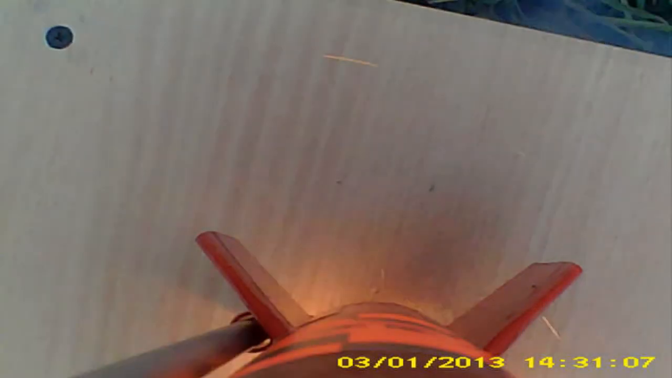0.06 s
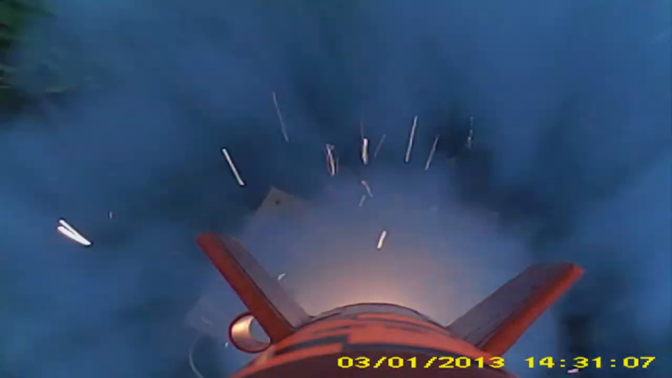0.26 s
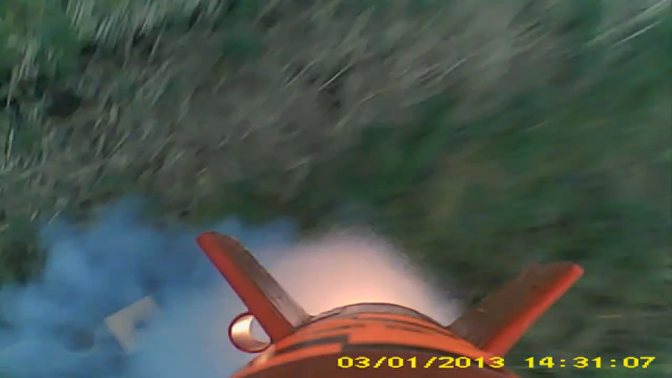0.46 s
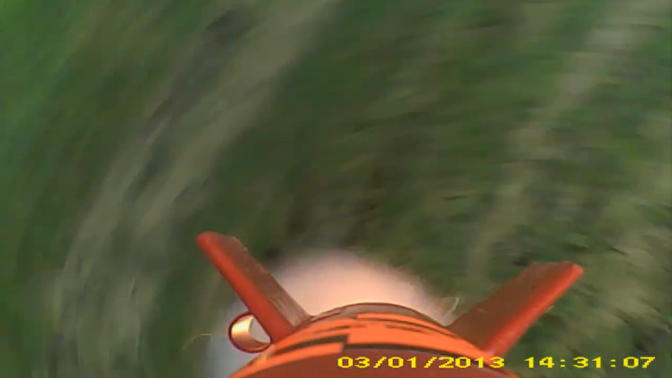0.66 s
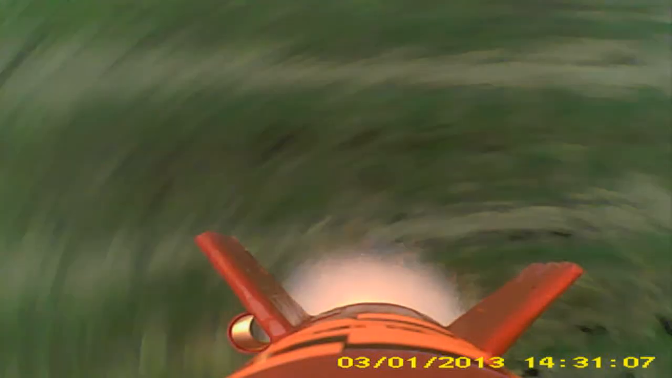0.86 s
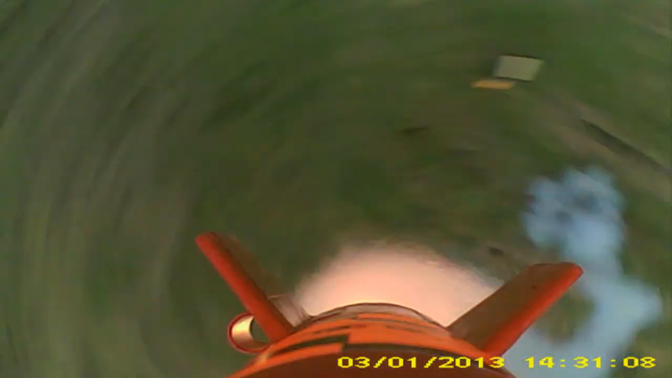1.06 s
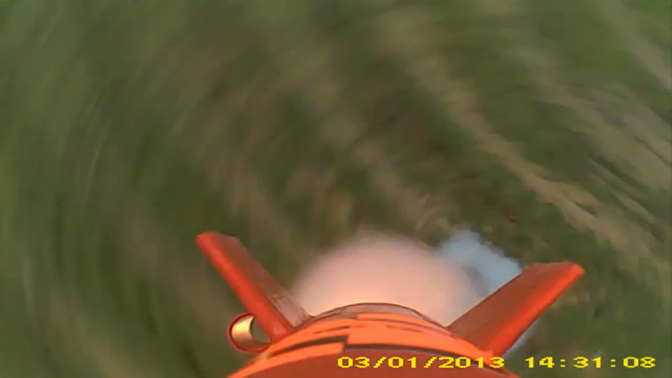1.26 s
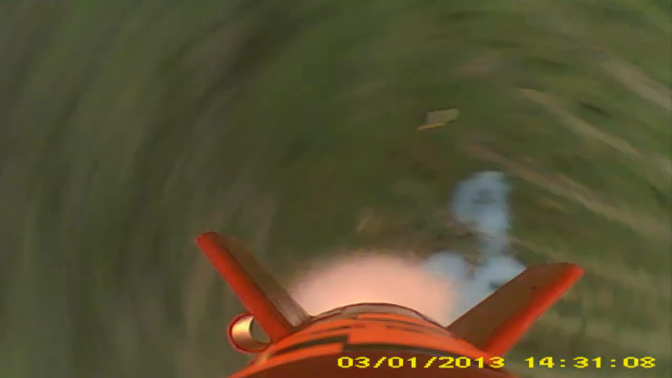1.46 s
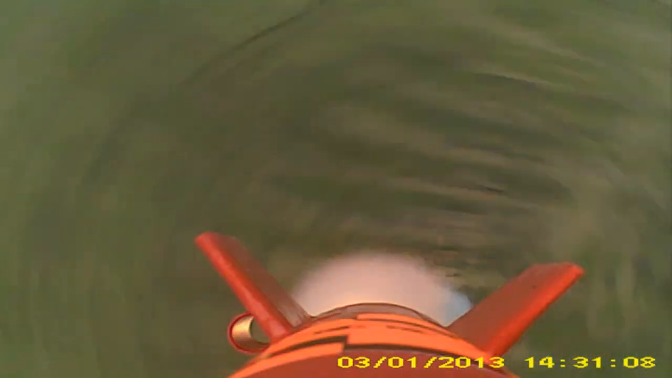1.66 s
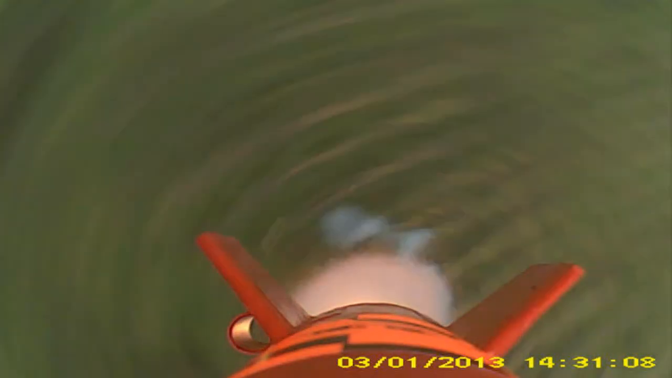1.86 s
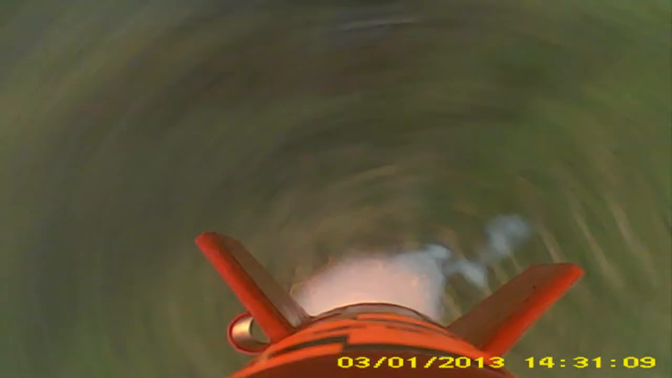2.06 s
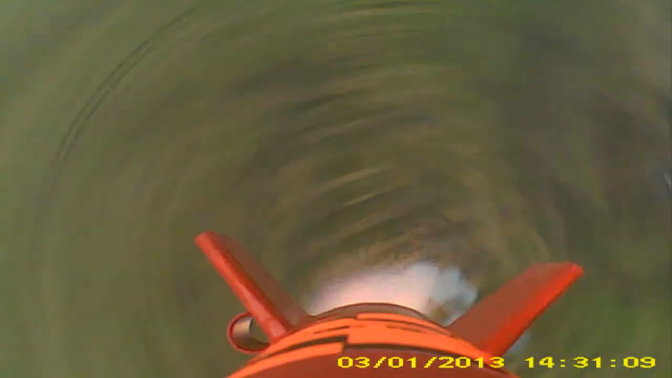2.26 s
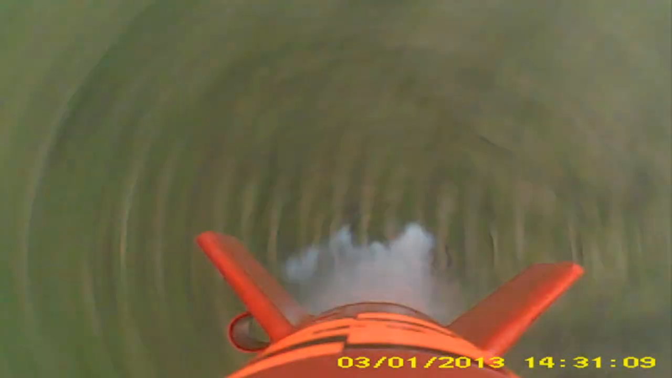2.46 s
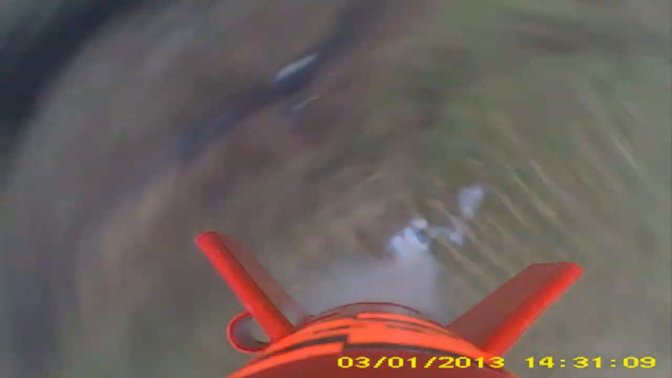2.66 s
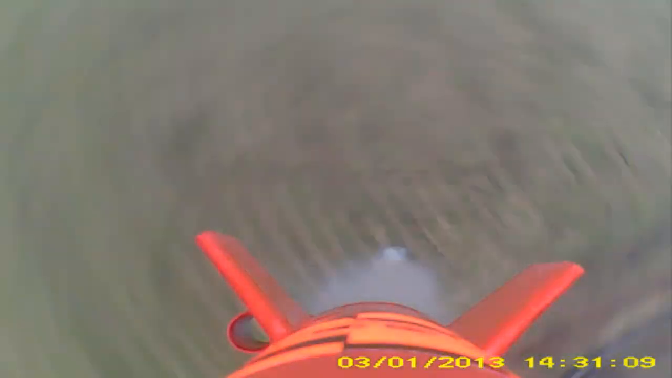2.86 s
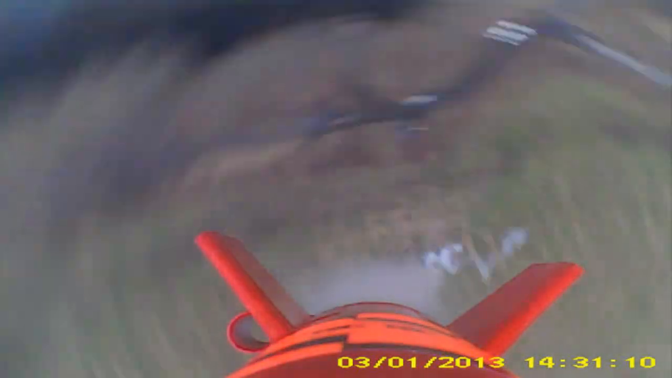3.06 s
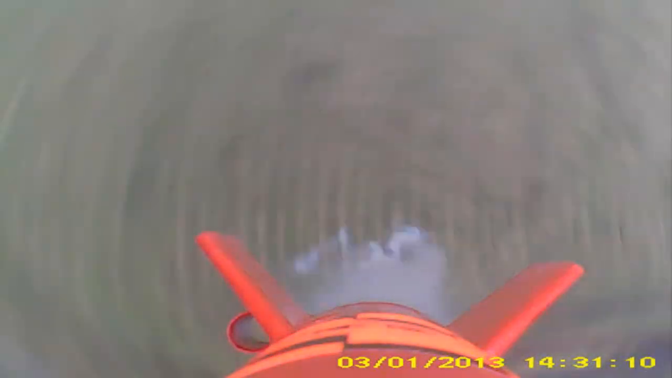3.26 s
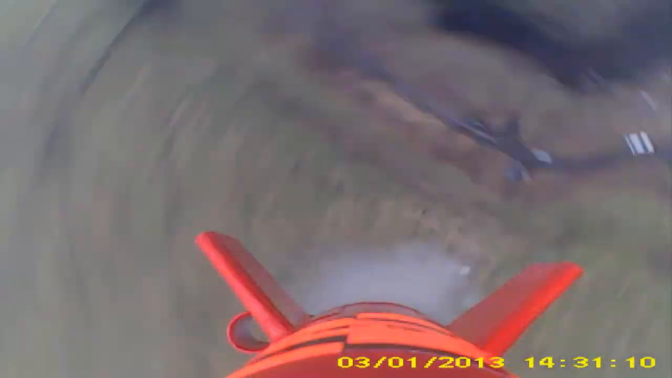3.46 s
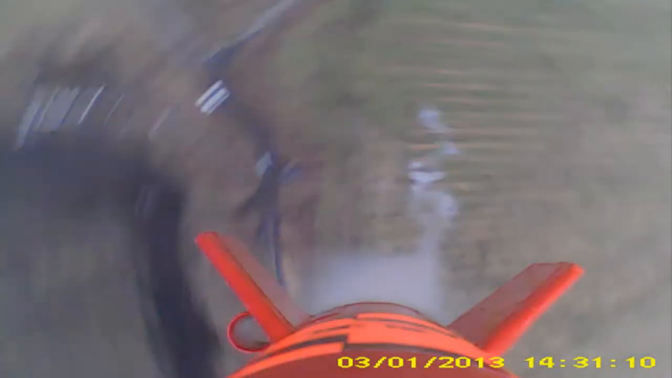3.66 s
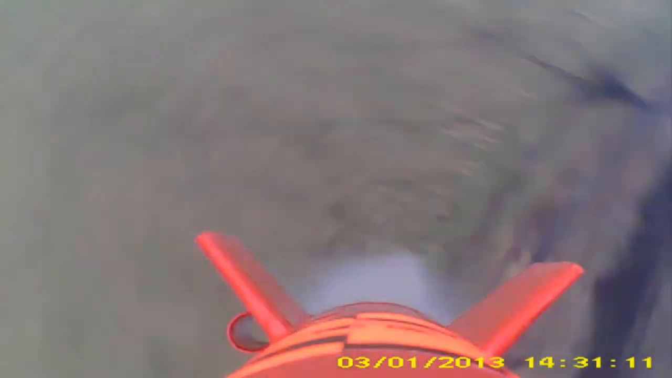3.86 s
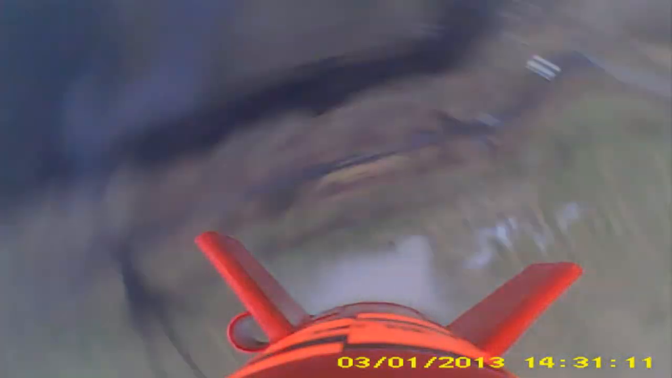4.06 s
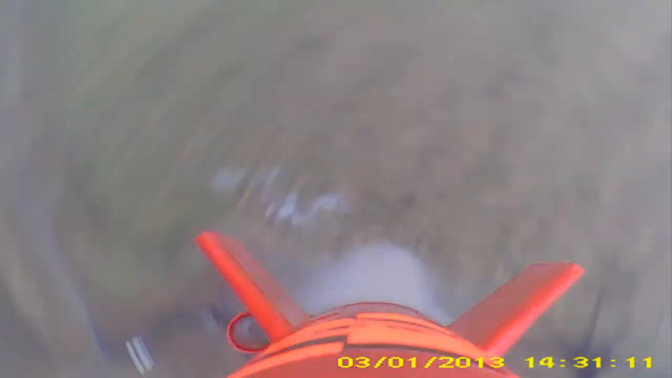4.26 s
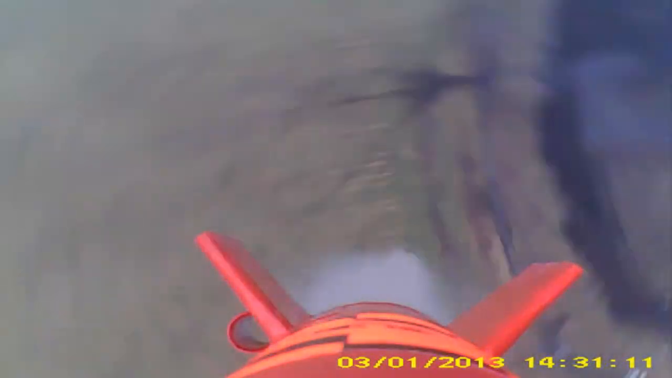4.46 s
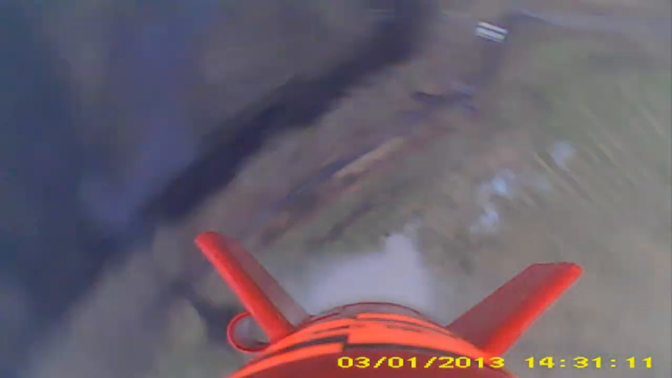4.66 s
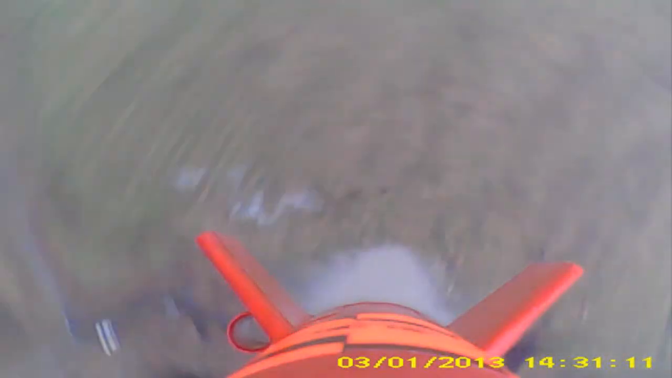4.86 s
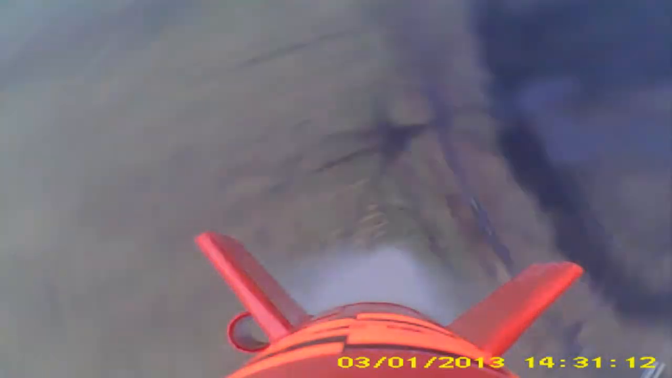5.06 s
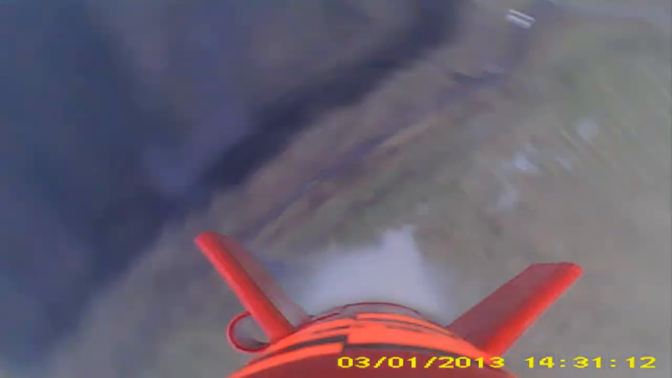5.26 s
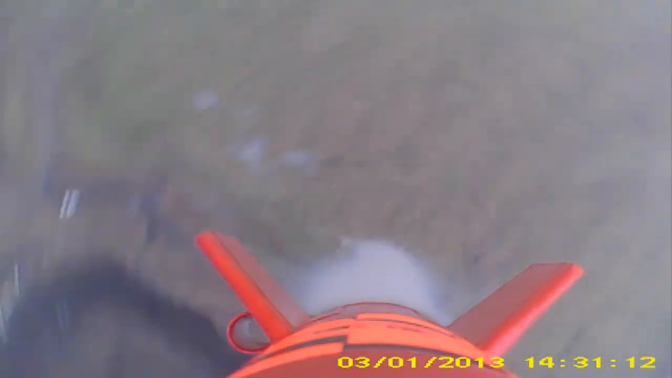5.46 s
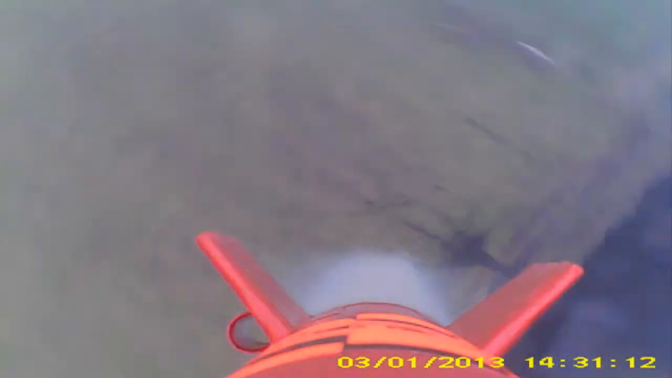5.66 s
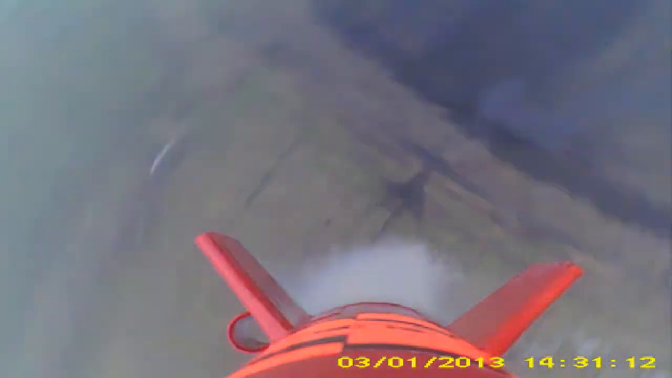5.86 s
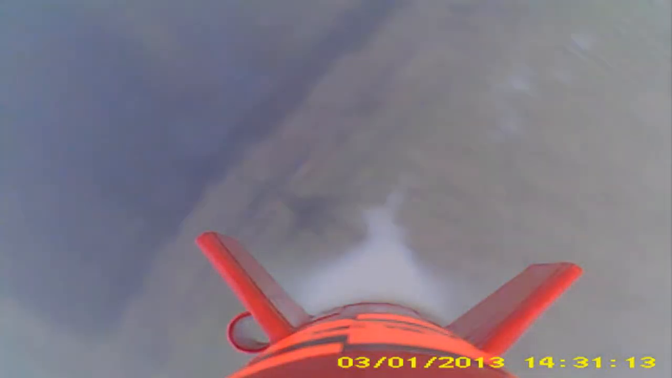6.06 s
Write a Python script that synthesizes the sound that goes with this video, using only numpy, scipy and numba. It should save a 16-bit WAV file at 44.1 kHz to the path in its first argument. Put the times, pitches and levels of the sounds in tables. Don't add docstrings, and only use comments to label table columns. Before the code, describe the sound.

A tiny, low-quality microphone rides on a hobby rocket outdoors, very close and dry, with gritty, band-limited sound and a brittle metallic hiss on top. From 0 to 0.12 s the motor chuffs in a quick string of uneven pops, with a tiny hush before it catches. Until about 0.5 s the ignition blast rumbles and crackles harshly. From 0.5 to 1 s a clearer, hollow, tube-like roar swells with less crackle, dipping for an instant near 0.94 s. From 1.2 s wind increasingly overloads the microphone, and from 1.4 to about 4 s dense ragged static and buffeting mask the muffled roar. From 4.5 s the crackle gradually thins. Around 5.65 to 5.72 s come a few short gust snaps and a momentary calm; then a fuller, smoother rush rises, dips briefly at 5.97 s and continues to the end.

```python
import sys
import numpy as np
from scipy import signal
from scipy.fft import rfft, irfft, next_fast_len
from scipy.io import wavfile
from scipy.ndimage import uniform_filter1d, map_coordinates
from numba import njit

SR = 44100
rng = np.random.default_rng(int(sys.argv[2]) if len(sys.argv) > 2 else 0)


def invert_db(level):
    return 10 ** (np.asarray(level, dtype=float) / 20)


def log_audio(samples):
    frames = np.atleast_2d(samples).T
    limited = np.clip(frames, -1, 1)
    pcm = np.round(limited * 32767).astype(np.int16)
    wavfile.write(sys.argv[1], SR, pcm)


N = 269892
RATE = 8000
RAIL = .29
COUNT = int(N * RATE / SR) + 8
IGNITED_S, CLEARS_PAD_S = .118, .5
T = np.arange(COUNT) / RATE
LIT = T > IGNITED_S
NEAR_PAD = LIT & (T < CLEARS_PAD_S)


def curves(table):
    s, *columns = np.transpose(table)
    return [np.interp(T, s, c) for c in columns]


def steady(x):
    return x / np.sqrt(uniform_filter1d(x ** 2, size=1600))


def low_pass(x, order, top_hz):
    return signal.lfilter(*signal.butter(order, top_hz, fs=RATE), x)


def walk(rate_hz):
    k = int(RATE / rate_hz)
    held = np.repeat(rng.standard_normal(COUNT), k)[:COUNT]
    w = uniform_filter1d(uniform_filter1d(held, k), k)
    return w / w.std()


@njit
def band(x, hz, width_hz):
    y, b, l = np.empty(len(x)), 0., 0.
    for i in range(len(x)):
        g, k = np.tan(np.pi * hz[i] / RATE), width_hz[i] / hz[i]
        v = (b + g * (x[i] - l)) / (1 + g * (g + k))
        b, l, y[i] = 2 * v - b, l + 2 * g * v, k * v
    return y


# (time [s], level [dB], tube resonance [Hz])
ROAR = [(0, -13, 1080), (.12, -17.5, 1020), (.2, -22.5, 1496), (.3, -21.5, 1735), (.47, -19.5, 1550),
        (.52, -18.5, 940), (.88, -16, 1066), (1.0, -17.5, 1110), (1.15, -19, 1265), (1.4, -32.5, 1309),
        (2.3, -24.5, 1057), (3.0, -28, 1143), (3.9, -27, 1498), (4.6, -24, 1449), (5.2, -26.5, 1402),
        (5.68, -27.5, 1331), (5.82, -17, 1157), (6.12, -15.5, 990)]


def roar(share):
    rush_db, hz = curves(ROAR)
    louder_db = rush_db + 19.5
    width_hz = 850 + 32 * share
    boom_db = -9 + .71 * share + 1.31 * louder_db
    hiss_db = -7.5 + .29 * share - .16 * louder_db
    hiss_db += -8 * ~LIT + 4 * NEAR_PAD
    tube, boom, hiss, buffet = rng.standard_normal((4, COUNT))

    dull, bright = low_pass(tube, 4, 1900), low_pass(tube, 4, 2500)
    tube = dull + np.clip(share / 10, 0, 1) * LIT * (bright - dull)
    tube = steady(band(band(tube, hz, 1.7 * width_hz), hz, 1.7 * width_hz))
    boom = steady(band(band(boom, .27 * hz, .62 * hz), .45 * hz, .63 * hz))
    hiss = signal.lfilter(*signal.butter(1, 250, "high", fs=RATE), hiss)
    rush = steady(tube + invert_db(boom_db) * boom + invert_db(hiss_db) * hiss)
    rush *= invert_db(rush_db + flame_db() + lulls_db())

    rocking = invert_db(-32) * (share / 25) ** 2 + invert_db(-29.5) * NEAR_PAD
    return rush + rocking * steady(low_pass(buffet, 1, 220)), tube


# (time [s], peak [dB])
CHUFFS = [(.002, -28), (0.011, -33), (0.022, -26), (0.032, -20), (0.044, -27), (.056, -37), (.061, -16),
          (.072, -23), (0.078, -17), (.087, -17), (0.114, -24), (.123, -24)]


def flame_db():
    puffs = sum(invert_db(db + 19) * np.exp(-((T - s - .003) / .0019) ** 2) for s, db in CHUFFS)
    db = np.where(T < IGNITED_S + .01, 20 * np.log10(.4 + 1.1 * puffs), 1.1 * walk(40))
    return db - 10 * ((T > .096) & (T < .115))


# (time [s], strength [suction rms], half-length [s])
GUSTS = [
    (.0625, 6, .0001),
    (.0882, 6, .0001),
    (5.68, -.6, .055),
    (5.651, 1.6, .003),
    (5.675, 1.8, .003),
    (5.689, 1.5, .002),
    (5.699, 1.8, .0004),
    (5.712, 1.3, .005),
    (5.724, 1.6, .001),
]


def gusts():
    return sum(size * (np.abs(T - s) < half_s) for s, size, half_s in GUSTS)


# (time [s], readings on the rail [%])
SLIPSTREAM = [(0, 0), (.125, 4.5), (.21, 11), (.28, 27), (.34, 23), (.4, 12.5), (.48, 8.5), (.52, .7),
              (.8, 1.6), (1.0, 7), (1.15, 13), (1.35, 23), (2.5, 28.5), (3.75, 22.5), (4.6, 12.5),
              (5.5, 5.2), (5.76, 2), (6.12, 1.8)]


def overload():
    share, = curves(SLIPSTREAM)
    rush, tube = roar(share)
    fast = steady(signal.lfilter([1], [1, .45], rng.standard_normal(COUNT)))
    falling = steady(.4 * np.roll(tube, -1) - .11 * np.roll(tube, 1) + .3 * tube)
    eddy = np.clip(.33 + .019 * share, .01, 1)
    suction = np.sqrt(eddy) * fast - np.sqrt(1 - eddy) * falling
    suction += .037 * walk(25) + gusts()

    p = np.clip(share / 100 * LIT, 1e-4, .6)
    limit = 4.91 * ((1 - p) ** .14 - p ** .14)
    kick = .018 / (1 + 6.7 * p)
    drift = .031 / (1 + (p / .094) ** 2)
    ceiling = .24 + .0073 * share
    return convert(rush, suction - limit, kick, ceiling, drift, 5.9, .7)


@njit
def convert(rush, excess, kick, ceiling, drift, depth, fade):
    y, rebound, centre = np.empty(len(rush)), 0., 0.
    for i in range(len(rush)):
        if excess[i] > 0:
            y[i] = -RAIL
            rebound += kick[i] * (1 + depth * excess[i])
        else:
            v = rush[i] + rebound + centre
            v /= (1 + (v / ceiling[i]) ** 2) ** .5
            y[i] = min(max(v, -RAIL), RAIL)
            rebound *= fade
        centre -= drift[i] * y[i]
    return y


# (block [number], peak [dB])
SEAMS = [(3, -64), (8, -67), (11, -70), (23, -67), (29, -59), (32, -67), (35, -59), (38, -64), (39, -68),
         (41, -68), (44, -63), (45, -65), (48, -66), (50, -63), (53, -62), (54, -67), (56, -66), (60, -66),
         (69, -65), (71, -60), (74, -66), (77, -63), (84, -69), (90, -64), (95, -63), (101, -61),
         (110, -60), (117, -69), (129, -70)]


def seam_ticks():
    block, peak_db = np.transpose(SEAMS)
    faint = np.setdiff1d([k for k in range(140) if k % 3 != 1], block)
    peak_db = np.append(peak_db, -85 + 6 * rng.standard_normal(len(faint)))
    s = .1447 + 2048 / 48000 * np.append(block, faint)
    spikes = np.zeros(N)
    spikes[((s + .0012) * SR).astype(int)] = invert_db(peak_db + 23.5) * np.sign(rng.standard_normal(len(s)))
    u = np.arange(-20, 21) / SR / 5e-5
    return np.convolve(spikes, u * np.exp(-u ** 2), "same")


# (time [s], depth [dB], recovery [s])
LULLS = [
    (0.936, -11, 0.026),
    (5.971, -8, 0.03),
]


def lulls_db():
    return sum(depth_db * (T > s) * np.exp(-((T - s) / back_s) ** 2) for s, depth_db, back_s in LULLS)


def interpolate(readings):
    place = np.arange(N) * RATE / SR - 13 / 24
    return map_coordinates(readings, [place], order=3, prefilter=False, mode="nearest")


def scene():
    readings = signal.lfilter([1.25], [1, .25], overload())
    return (interpolate(readings) + seam_ticks())[None]


# (frequency [Hz], level [dB])
PLAYER = [(5000, 0.5), (6000, 2), (7000, 11), (8500, 4.5), (10000, -6.5), (11500, -21), (12500, -25),
          (13700, -40)]


def roll_off(x):
    hz, db = np.transpose(PLAYER)
    size = next_fast_len(N + 4096)
    bins_hz = np.arange(size // 2 + 1) * SR / size
    gain = invert_db(np.interp(np.log(bins_hz + 1), np.log(hz), db))
    return irfft(rfft(x, size) * gain, size)[:, :N]


def top_cut(x):
    return signal.sosfilt(signal.butter(12, 13630, fs=SR, output="sos"), x)


def record(dry):
    return top_cut(roll_off(dry))


dry = scene()
out = record(dry)
log_audio(out)
```